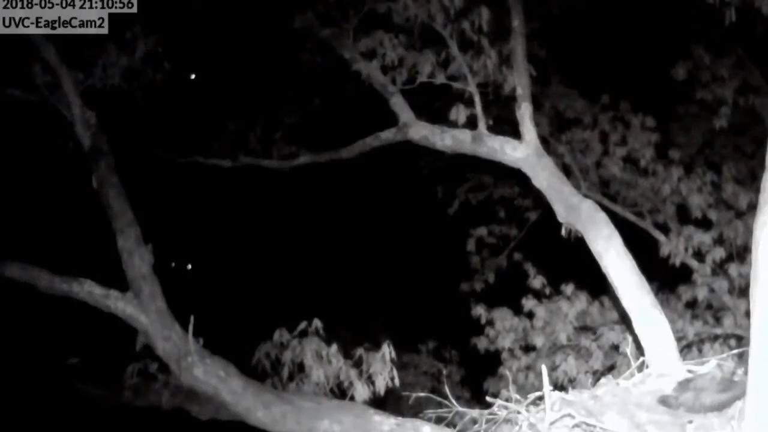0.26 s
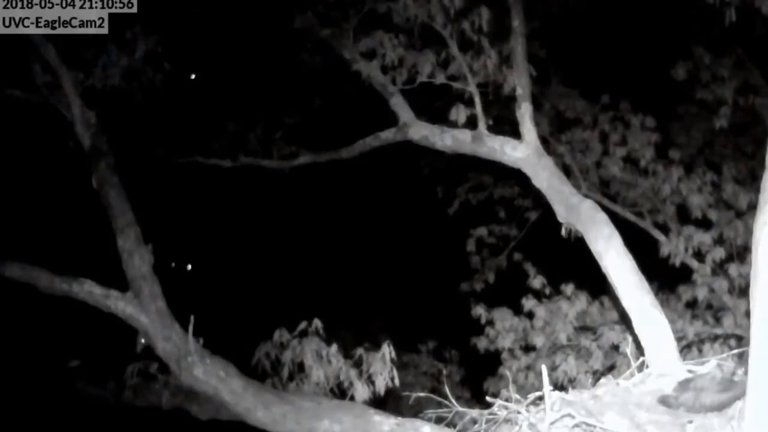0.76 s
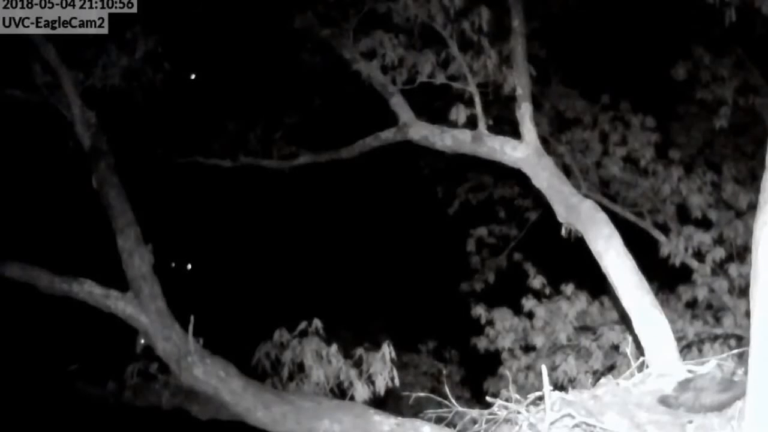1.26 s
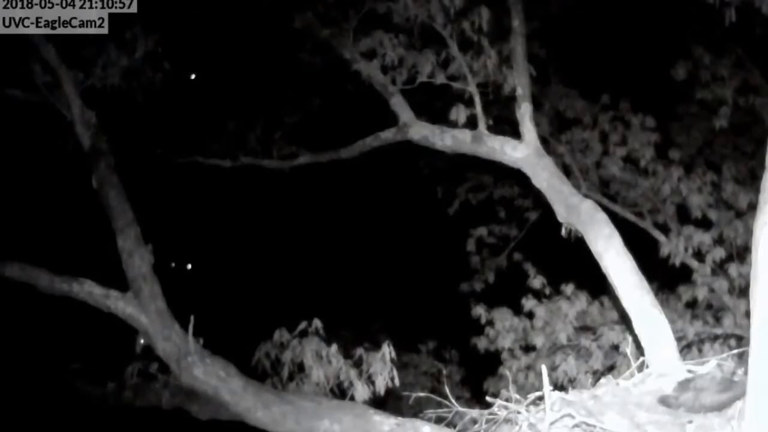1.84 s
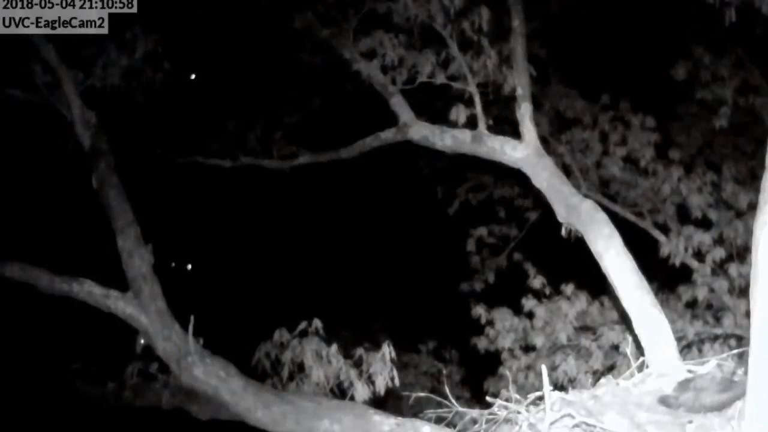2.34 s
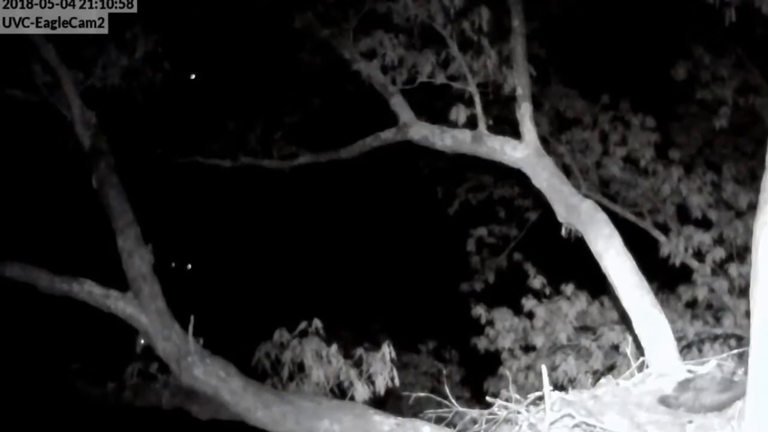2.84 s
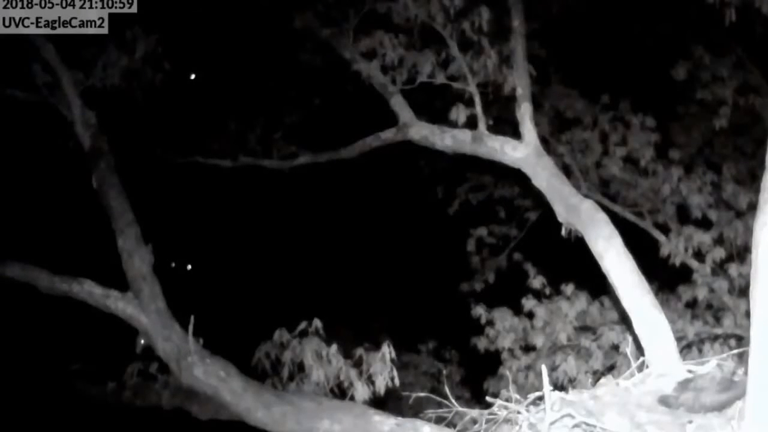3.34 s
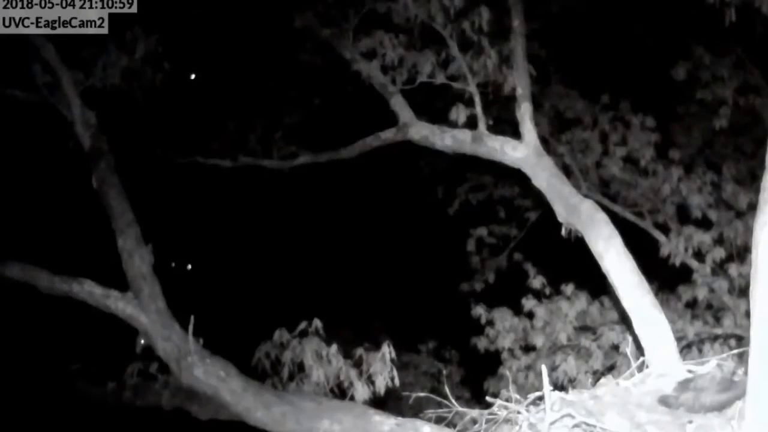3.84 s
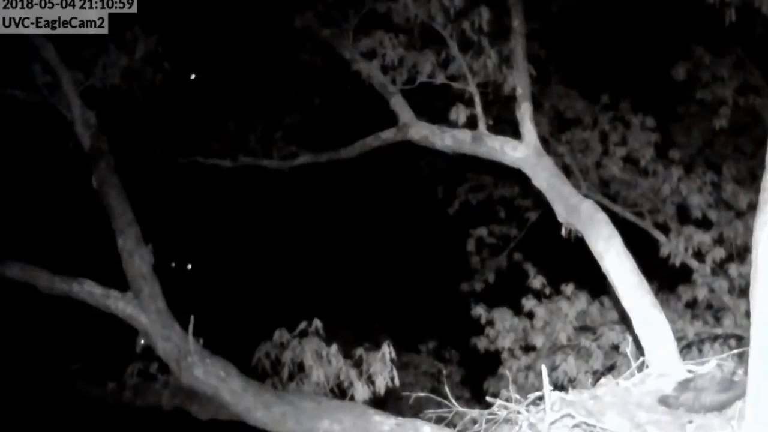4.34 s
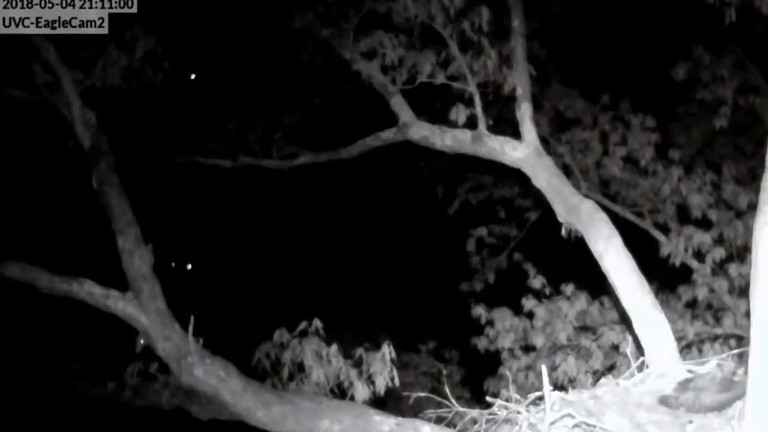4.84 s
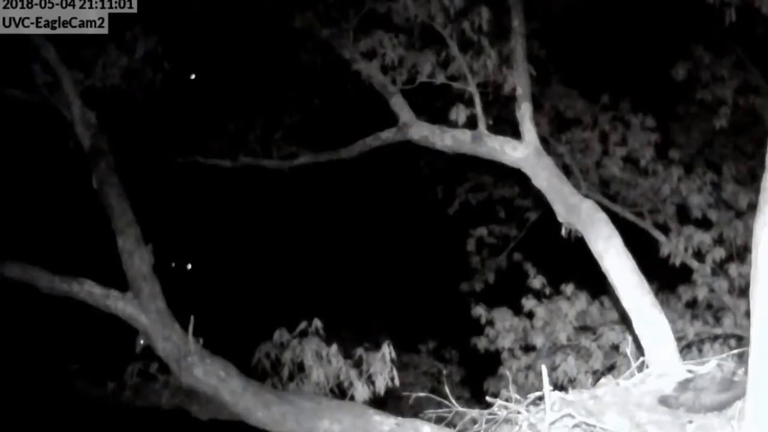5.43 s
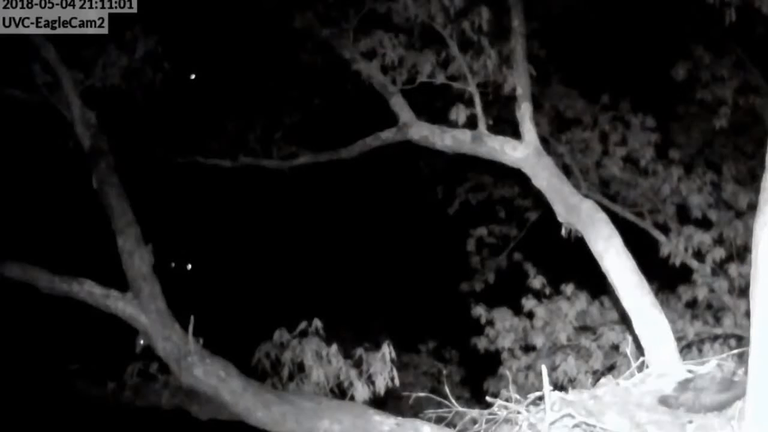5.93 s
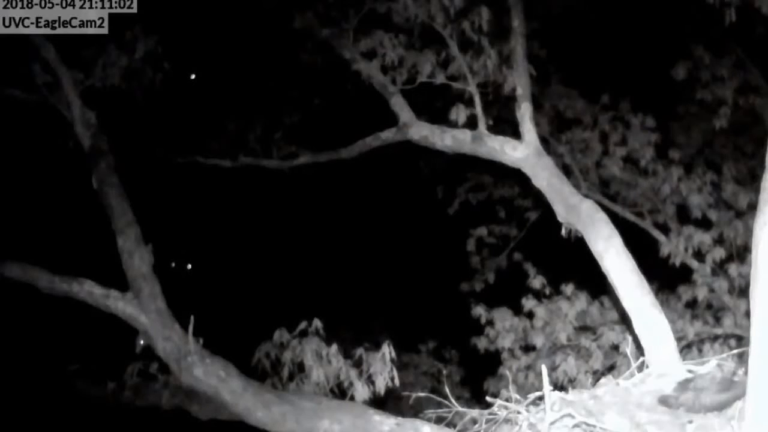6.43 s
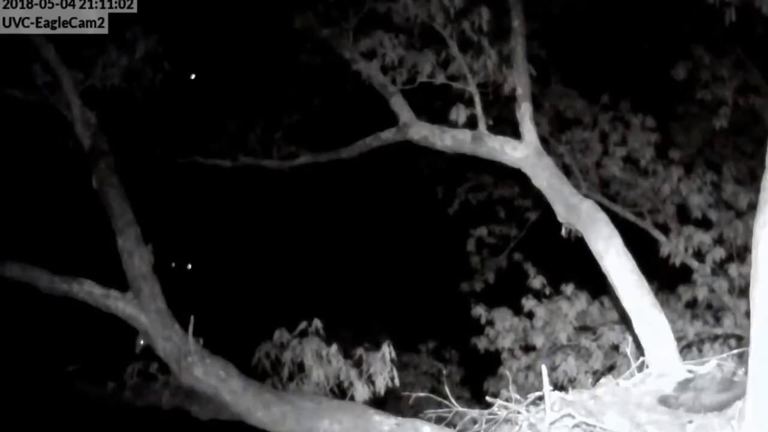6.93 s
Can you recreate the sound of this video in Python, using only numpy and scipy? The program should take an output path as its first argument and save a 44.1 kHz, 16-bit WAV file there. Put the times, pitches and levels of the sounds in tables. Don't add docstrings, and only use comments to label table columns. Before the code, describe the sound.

Harsh rapid eagle chatter with piercing pips echoes through dark woodland, broken by one hollow rising and falling hoot, above soft hiss and distant hum.

```python
import sys
import numpy as np
from scipy import signal
from scipy.fft import rfft, irfft, next_fast_len
from scipy.io import wavfile
from scipy.ndimage import uniform_filter1d

SR = 44100
rng = np.random.default_rng(int(sys.argv[2]) if len(sys.argv) > 2 else 0)


def wav_out(sig):
    wavfile.write(sys.argv[1], SR, np.round(np.clip(np.atleast_2d(sig).T, -1, 1) * 32767).astype(np.int16))


def voltage_ratio(decibels):
    exponent = np.asarray(decibels, float) / 20
    return 10 ** exponent


N = 317079

# (centre [s], peak [dB], pitch [Hz])
PIPS = [(0.066, -28, 4050), (0.3701, -23.5, 4350), (1.4289, -26, 3610), (1.4406, -27, 3490),
        (1.5258, -30, 3340), (1.5406, -21, 3720), (1.5541, -20.5, 3770), (1.63, -13.5, 3974),
        (1.6421, -16, 4316), (1.6517, -21, 3970), (1.9132, -6, 3200), (2.012, -34.5, 4300),
        (2.121, -36.5, 3540), (2.2861, -34, 3330), (4.461, -6.5, 3892), (4.4771, -10.5, 3925),
        (4.4865, -12.5, 3810), (4.5785, -5, 3896), (4.5935, -14, 3963), (4.7016, -4, 3178),
        (4.8129, -8, 3095), (4.8201, -18.5, 3290), (4.9312, -14, 2977), (5.037, -21.5, 3705),
        (5.134, -34, 3700), (5.2522, -35, 3260), (6.9055, -5.5, 2902)]
# (centre [s], peak [dB], pitch [Hz])
SQUEAKS = [(0.172, -17, 3620), (0.1849, -13, 2730), (0.3489, -29, 3770), (0.3666, -17, 3890),
           (0.4, -16, 3010), (0.4213, -19.5, 3160), (0.4302, -14, 3695), (0.4657, -11, 2530),
           (0.476, -14.5, 3070), (1.7246, -13, 3900), (1.731, -23.5, 3860), (1.7391, -16, 3700),
           (2.3806, -23, 2710), (4.355, -26.5, 3275), (4.3718, -25, 3680), (4.5638, -20.5, 3520)]
# (centre [s], peak [dB], pitch [Hz], width [ms])
WHISTLES = [(0.3662, -27, 3640, 13), (1.3207, -27.5, 3110, 6.8), (1.8159, -23.5, 3084, 8.8),
            (2.2614, -30.5, 3710, 22), (2.3, -38, 3750, 25), (2.336, -40, 3655, 15), (2.37, -38, 3540, 14),
            (5.7385, -8, 2833, 10), (5.7575, -8, 2831, 15), (5.769, -13, 2778, 8.9), (5.787, -17, 2880, 23),
            (6.9, -26, 2930, 11), (7.032, -10, 3120, 7.1), (7.0445, -3.5, 3192, 12),
            (7.0585, -8.5, 3080, 4.1), (7.067, -14.5, 2900, 6.4)]
PIP_MS, SQUEAK_MS = 6.34, 1.9

# (start [s], length [s], effort [dB])
SYLLABLES = [(0.003, .075, -26.5), (0.085, .155, -19.5), (0.347, .055, -31.5), (0.399, .13, -19.5),
             (1.22, .06, -32), (1.289, 0.033, -30.5), (1.423, 0.063, -26), (1.507, 0.091, -27.5),
             (1.607, .086, -25.5), (1.721, .048, -28.5), (1.797, .05, -20.5), (1.905, .046, -33.5),
             (2.001, .048, -24.5), (2.11, 0.02, -28.5), (2.216, .034, -29), (2.351, .08, -24),
             (2.769, .048, -38), (4.32, .086, -27.5), (4.461, .044, -25), (4.553, .072, -24.5),
             (4.696, .035, -27), (4.793, .05, -26), (4.907, 0.024, -25.5), (5.02, .04, -29),
             (5.118, .02, -26.5), (5.234, 0.034, -32), (5.566, .04, -44.5), (5.927, .075, -42.5),
             (6.863, 0.046, -30.5), (7.019, .055, -27)]
# (time [s], peak [dB], ring [Hz])
ACCENTS = [(0.0984, -13.5, 2012), (0.134, -16, 2016), (0.151, -13, 1930), (0.089, -16.5, 2300),
           (0.1936, -10.5, 1980), (0.2066, -8.5, 1957), (0.2168, -13, 1912), (0.4092, -14.5, 2005),
           (0.4352, -13.5, 2007), (0.4442, -7, 1976), (0.4552, -15, 1990), (0.4958, -19, 1812),
           (1.4529, -19.5, 1960), (1.615, -10.5, 1965), (1.7063, -9.5, 1970), (1.7473, -16.5, 1994),
           (1.7969, -16, 1944), (1.8152, -20, 2110), (1.8957, -13, 1960), (2.3015, -24.5, 1746),
           (2.3968, -16, 1824), (4.445, -10.5, 1884), (4.683, -14, 2046), (4.7382, -19.5, 2013),
           (4.9539, -13, 1960), (5.7211, -29, 1800), (5.752, -20.5, 2220), (5.766, -34.5, 1778),
           (7.0142, -18, 1970), (7.033, -20, 2275)]
# (centre [Hz], width [Hz], level [dB])
PUFF_RESONANCES = [(182, 51, -1), (762, 52, -6), (1515, 83, -11), (2357, 860, 4.5), (3700, 290, -25.5),
                   (4300, 650, -13.5)]
PULSE_GAP_S, GAP_SPREAD = 0.0095, 0.22
FIRST_PULSE_DB, PULSE_SPREAD_DB, EDGE_LOSS_DB = 1, 3.0, 1
RING_HZ, RING_SPREAD_HZ = 1970, 90
BEAK_DB, CHEST_DB, AIR_RISE_S, AIR_FALL_S = -17.5, -24, 0.004, 0.021

# (time [s], peak [dB])
THUMPS = [(0.019, -26.5), (0.093, -30), (0.153, -19.5), (0.189, -19), (0.209, -22.5), (0.339, -32.5),
          (0.407, -20.5), (0.464, -24.5), (0.519, -22), (1.233, -30.5), (1.26, -25.5), (1.444, -22),
          (1.579, -29.5), (1.611, -22.5), (1.658, -33.5), (1.703, -24.5), (1.74, -30), (1.794, -24),
          (1.823, -20), (1.931, -31.5), (2.019, -32.5), (2.039, -32.5), (2.224, -32), (2.369, -25.5),
          (2.39, -26.5),
          (4.319, -28.5), (4.359, -30.5), (4.443, -31.5), (4.566, -26.5), (4.605, -35.5), (4.827, -30),
               (4.942, -31), (5.062, -30), (5.239, -38)]
THUMP_S, THUMP_DB = 0.0045, -10

# (time [s], pitch [Hz], level [dB])
HOOT = [
    (2.44, 215.5, -17),
    (2.492, 478, -22),
    (2.533, 524.7, -13),
    (2.811, 562.4, -12.5),
    (2.885, 594, -11.5),
    (2.951, 498.7, -18),
    (3.074, 364.6, -21),
    (3.2, 320, -21),
    (3.383, 195.2, -30),
]
# (frequency [Hz], gain [dB])
OWL_THROAT = [(200, -9), (350, -4.5), (520, 9), (700, 9), (900, -7.5), (1100, -29.5), (1600, -30),
              (2200, -33), (2700, -31.5), (3300, -48)]
QUAVER_HZ, QUAVER_TOP_S, QUAVER_SHARE = 16.7, 3.151, 0.052
QUAVER_BELOW_HZ, QUAVER_FULL_HZ = 520, 472
HOOT_ATTACK_S, HOOT_RELEASE_S = 0.02, 0.03

# (frequency [Hz], T60 [s])
WOOD_T60 = [(100, 1), (600, 1.03), (2000, 0.46), (2900, 1.07), (3900, 0.59), (5500, 0.47)]
# (delay [s], level [dB])
ECHOES = [
    (.122, -13),
    (.215, -21),
]

# (frequency [Hz], density [dB per Hz])
NIGHT = [(15, -5.5), (27, -20.5), (70, -11.5), (151, -19), (225, -19.5), (305, -23.5), (550, -27),
         (966, -23.5), (1060, -33), (1500, -32), (2300, -34.5), (3500, -38.5), (5500, -45.5)]
# (centre [Hz], width [Hz], boost [dB])
HOUSING = [(798.4, 11, 12.5), (1960, 96, 9.5), (2720, 200, 6.5)]
# (time [s], level [dB])
HUM = [(0.0, -47.5), (1.14, -52), (1.58, -51.5), (4.31, -48.5), (5.63, -62.5), (7.19, -58)]
NIGHT_DB, HUM_HZ = -46.5, 116.1

# (frequency [Hz], level re tone [dB])
MASK = [(1000, -65), (1400, -69), (2000, -84), (3000, -69), (3900, -67.5), (5500, -71)]
SLOW = 4
LEAK_POWER = 3.006
IMAGE_GATE_DB, IMAGE_FROM_HZ = -78.5, 7300


def rms_one(x):
    return x / np.sqrt(np.mean(x ** 2) + 1e-20)


def at_hz(points, hz):
    table = np.array(points)
    return np.interp(np.log(hz + 1), np.log(table[:, 0]), table[:, 1])


def resonance(x, hz, width_hz):
    r = np.exp(-np.pi * width_hz / SR)
    poles = [1, -2 * r * np.cos(2 * np.pi * hz / SR), r * r]
    return signal.lfilter([(1 - r * r) / 2, 0, (r * r - 1) / 2], poles, x)


def band_pass(x, low_hz, high_hz, order):
    return signal.sosfilt(signal.butter(order, [low_hz, high_hz], "band", fs=SR, output="sos"), x)


def add(out, s, piece):
    i = max(round(s * SR), 0)
    out[i:i + len(piece)] += piece[:N - i]


def pulses():
    rows, hard_s = list(ACCENTS), np.array(ACCENTS)[:, 0]
    draws = rng.standard_normal((len(SYLLABLES), 3, 24))
    for (start, length, effort_db), (gap, size, tune) in zip(SYLLABLES, draws):
        late = np.cumsum(PULSE_GAP_S * np.exp(GAP_SPREAD * gap))
        late = late - late[0]
        level_db = effort_db + np.where(late > 0, PULSE_SPREAD_DB * size, FIRST_PULSE_DB)
        level_db = level_db - EDGE_LOSS_DB * (late / length) ** 2
        distance_s = np.abs(start + late[:, None] - hard_s).min(axis=1)
        free = (late < length) & (distance_s > PULSE_GAP_S / 2)
        ring_hz = RING_HZ + RING_SPREAD_HZ * tune
        rows += list(np.transpose([start + late, level_db, ring_hz])[free])
    return rows


def rasps():
    ring, puff, crack = np.zeros((3, N))
    t = np.arange(1300) / SR
    burst_shape = t / 0.002 * np.exp(1 - t / 0.002)
    shape = (t / 0.0016) ** 1.45 * np.exp(1.2 - 1.132 * t / 0.0015)
    ragged_shape = t / 0.0045 * np.exp(1 - t / 0.006)
    for (s, level_db, hz), draw in zip(pulses(), rng.standard_normal((300, len(t) + 2))):
        tone = 0.7 * shape * np.sin(2 * np.pi * hz * t + 3 * draw[0])
        ragged = voltage_ratio(-23) * rms_one(resonance(draw[:1:-1], hz, width_hz=140)) * ragged_shape
        add(ring, s - 0.0016, voltage_ratio(level_db) * (tone + ragged))
        burst = burst_shape * draw[2:]
        add(puff, s - 0.002, voltage_ratio(1.133 * level_db - 4 + 2 * draw[1]) * burst)
        add(crack, s - 0.002, voltage_ratio(2 * level_db) * burst)
    coloured = np.zeros(N)
    for hz, width_hz, level_db in PUFF_RESONANCES:
        coloured += voltage_ratio(level_db) * resonance(puff + 1e-18, hz, width_hz) * np.sqrt(4000 / width_hz)
    voice = signal.sosfilt(signal.butter(8, 4100, fs=SR, output="sos"), ring + voltage_ratio(-7) * coloured)
    return voice + voltage_ratio(-5.0) * band_pass(crack + 1e-18, 4300, 6000, 2)


def pips():
    out, t = np.zeros(N), np.arange(-1100, 2600) / SR
    notes = WHISTLES + [(*row, PIP_MS) for row in PIPS] + [(*row, SQUEAK_MS) for row in SQUEAKS]
    draws = rng.standard_normal((len(notes), len(t) + 2))
    for (s, level_db, hz, width_ms), draw in zip(notes, draws):
        skew = np.where(t < 0, 1.1, 0.93)
        bell = 0.5 ** (np.abs(2000 * t / width_ms) * skew) ** 2.5
        bend = (3.2 + 0.5 * draw[0]) * min(PIP_MS / width_ms, 1)
        phase = 2 * np.pi * hz * (t - bend * t * np.abs(t)) + 2 * np.pi * hz * s
        tone = np.sin(phase) + voltage_ratio(-33.0) * np.sin(2 * phase)
        clean = np.clip(1.44 + level_db / 30 + width_ms / 25, 0.35, 1)
        air = rms_one(band_pass(draw[2:], hz - 330, hz + 330, 4))
        linger = np.where(t < 0, bell ** 0.24, np.exp(-t / 0.016))
        air_db = 0.87 * min(level_db, -15) - 14 - 0.5 * width_ms
        splash = band_pass(draw[:1:-1], 3900, 6000, 2)
        splash_db = 1.15 * level_db - 5.0 - 2.0 * width_ms + 18.0 * np.minimum(hz / 1000 - 3.2, 0)
        add(out, s - 0.002 + t[0], voltage_ratio(splash_db) * np.sqrt(bell) * splash)
        add(out, s + t[0], voltage_ratio(level_db) * clean * bell * tone + voltage_ratio(air_db) * linger * air)
    return out


def breath():
    effort, t = np.zeros(N), np.arange(N) / SR
    white = rng.standard_normal((3, N))
    flutter = voltage_ratio(4.8 * rms_one(resonance(white[2], 130, width_hz=90)))
    beak = resonance(white[0], 1980, 210)
    beak = beak + 0.61 * resonance(white[0], 2800, 550) - 0.37 * resonance(white[0], 3870, 270)
    beak = rms_one(flutter * band_pass(beak, 1500, 4200, 5))
    chest = rms_one(band_pass(flutter * white[1], 40, 550, 2))
    for start, length, effort_db in SYLLABLES:
        slope = np.minimum((t - start) / AIR_RISE_S, (start + length - t) / AIR_FALL_S)
        effort += voltage_ratio(effort_db) * np.exp(np.minimum(slope, 0))
    return effort * (voltage_ratio(BEAK_DB) * beak + voltage_ratio(CHEST_DB) * chest)


def thumps():
    out, t = np.zeros(N), np.arange(1300) / SR
    shape = t / THUMP_S * np.exp(1 - t / THUMP_S)
    for (s, level_db), draw in zip(THUMPS, rng.standard_normal((40, len(t)))):
        puff = shape * rms_one(band_pass(draw, 45, 860, 3))
        add(out, s, voltage_ratio(level_db + THUMP_DB) * puff / np.abs(puff).max())
    return out + 3.2 * resonance(out, 120, width_hz=140) + 0.85 * resonance(out, 770, width_hz=55)


def owl():
    t = np.arange(N) / SR
    s, *columns = np.transpose(HOOT)
    pitch, level_db = [np.interp(t, s, c) for c in columns]
    quaver = np.clip((QUAVER_BELOW_HZ - pitch) / (QUAVER_BELOW_HZ - QUAVER_FULL_HZ), 0, 1)
    quaver = QUAVER_SHARE * quaver * (t > s[np.argmax(columns[0])])
    pitch = pitch * (1 + quaver * np.cos(2 * np.pi * QUAVER_HZ * (t - QUAVER_TOP_S)))
    phase = 2 * np.pi * np.cumsum(pitch) / SR
    orders = np.arange(1, 7)[:, None]
    slack = np.clip(1.35 - pitch / 430, 0.12, 1)
    draws = rng.standard_normal((len(orders), N))
    flicker_db = 3.9 * np.array([rms_one(resonance(row, 4.5, width_hz=23)) for row in draws])
    gains = voltage_ratio(at_hz(OWL_THROAT, orders * pitch)) * slack ** (0.34 * np.minimum(orders - 1, 2))
    gains = gains * np.where(orders * pitch > 1350, voltage_ratio(0.87 * (level_db + 21.5) + flicker_db), 1)
    tone = np.sum(gains * np.sin(orders * phase), axis=0) / np.sqrt(np.sum(gains ** 2, axis=0) / 2)
    ramp = np.minimum((t - s[0]) / HOOT_ATTACK_S, (s[-1] - t) / HOOT_RELEASE_S)
    return tone * voltage_ratio(level_db) * np.clip(ramp, 0, 1)


def wood(x, tail_db, echo_db, rise_s, near=0):
    t, edges_hz = np.arange(SR) / SR, np.geomspace(80, 5500, 10)
    tail = np.zeros(SR)
    for low, high in zip(edges_hz, edges_hz[1:]):
        scatter = band_pass(rng.standard_normal(SR), low, high, 2)
        tail += scatter * voltage_ratio(-60 * t / at_hz(WOOD_T60, np.sqrt(low * high)))
    onset = np.clip(t / rise_s, 0, 1) + near * np.exp(-t / 0.02)
    tail *= onset * voltage_ratio(tail_db)
    tail[0] = 1
    for lag, level_db in ECHOES:
        tail[round(lag * SR)] += voltage_ratio(level_db + echo_db)
    return signal.fftconvolve(x, tail)[:N]


def night():
    size = next_fast_len(N)
    colour = voltage_ratio(at_hz(NIGHT, np.fft.rfftfreq(size, 1 / SR)))
    hiss = irfft(rfft(rng.standard_normal(size)) * colour, size)[:N]
    hiss = hiss + sum((voltage_ratio(boost_db) - 1) * resonance(hiss, hz, width_hz) for hz, width_hz, boost_db in HOUSING)
    hum = resonance(resonance(rng.standard_normal(N), HUM_HZ, width_hz=16), HUM_HZ, width_hz=16)
    hum_db = np.interp(np.arange(N) / SR, *np.transpose(HUM))
    return voltage_ratio(NIGHT_DB) * rms_one(hiss) + voltage_ratio(hum_db) * rms_one(hum)


def scene():
    chatter = wood(rasps() + breath() + thumps(), tail_db=-49, echo_db=-17.0, rise_s=0.0038)
    whistles = wood(pips(), tail_db=-48, echo_db=-19, rise_s=0.0023, near=2.0)
    hoot = wood(owl(), tail_db=-48, echo_db=-7, rise_s=0.1, near=1.5)
    return (whistles + chatter + hoot + night())[None]


def masked(x):
    hz, _, bins = signal.stft(x, SR / SLOW, "cosine", 1024)
    power = uniform_filter1d(np.abs(bins) ** 2, size=11, axis=0)
    loud = np.sum(np.abs(bins[(hz > 300) & (hz < 1000)]) ** 2, axis=0)
    loud = np.maximum(loud, signal.lfilter([0.3], [1, -0.62], loud))
    kept = power > loud * voltage_ratio(at_hz(MASK, hz))[:, None] ** 2
    return signal.istft(bins * (kept | (hz[:, None] < 1000)), SR / SLOW, "cosine", 1024)[1][:len(x)]


def stretched(slow):
    size = next_fast_len(N + SLOW)
    stuffed = np.zeros(size)
    stuffed[:len(slow) * SLOW:SLOW] = SLOW * slow
    hz = np.fft.rfftfreq(size, 1 / SR)
    leak = np.abs(np.sinc(hz * SLOW / SR) / np.sinc(hz / SR)) ** LEAK_POWER
    passed = (np.abs(hz - SR / SLOW) > 1750) & (hz < 15900)
    spectrum = rfft(stuffed) * passed * leak
    base = irfft(spectrum * (hz < IMAGE_FROM_HZ), size)[:N]
    images = irfft(spectrum * (hz >= IMAGE_FROM_HZ), size)[:N]
    power = uniform_filter1d(images ** 2, size=1024)
    return base + images * power ** 2 / (power ** 2 + voltage_ratio(4 * IMAGE_GATE_DB))


def top_cut(x):
    return signal.sosfilt(signal.butter(12, 16300, fs=SR, output="sos"), x)


def record(dry):
    slow = signal.resample_poly(dry[0], 1, SLOW)
    rising = np.sinc(np.fft.rfftfreq(len(slow))) ** -LEAK_POWER
    slow = irfft(rfft(slow) * np.sqrt(rising), len(slow))
    top, knee = 0.56, 7
    limited = slow / (1 + np.abs(slow / top) ** knee) ** (1 / knee)
    slow = masked(limited + 0.015 * slow ** 2)
    slow = irfft(rfft(slow) * np.sqrt(rising), len(slow))
    mix = stretched(slow)[None] - 0.0129
    return top_cut(mix)


dry = scene()
out = record(dry)
wav_out(out)
```